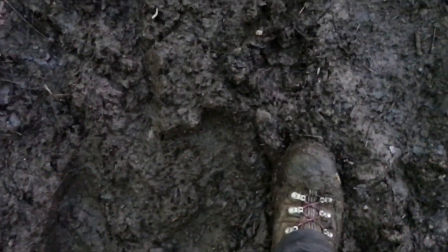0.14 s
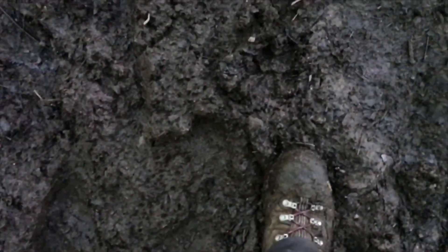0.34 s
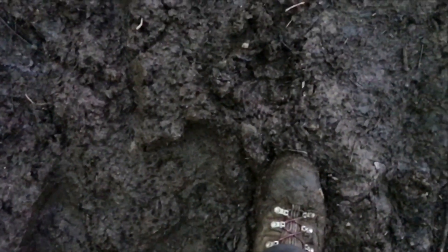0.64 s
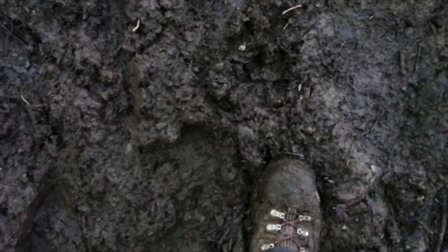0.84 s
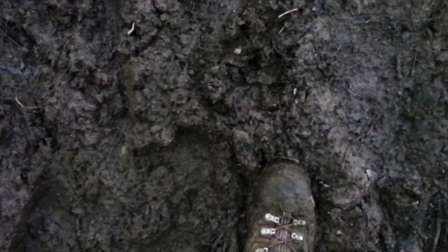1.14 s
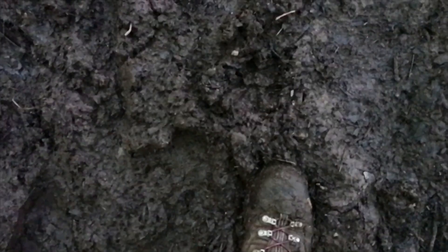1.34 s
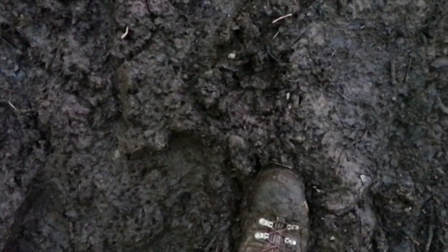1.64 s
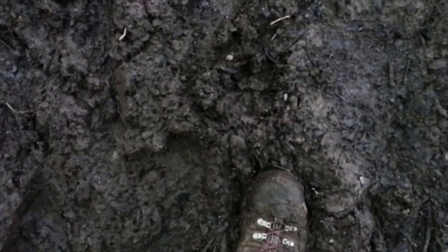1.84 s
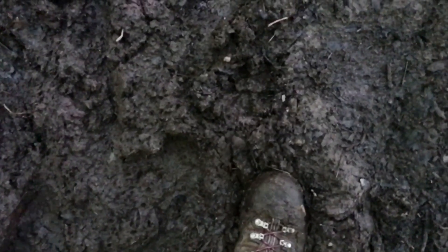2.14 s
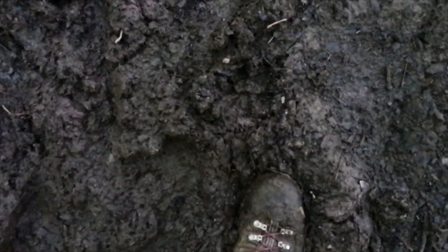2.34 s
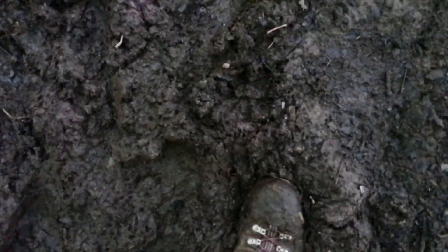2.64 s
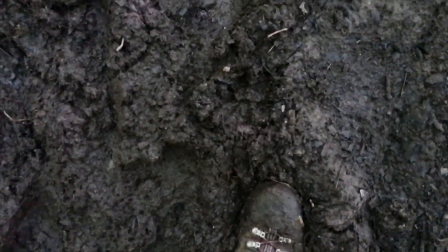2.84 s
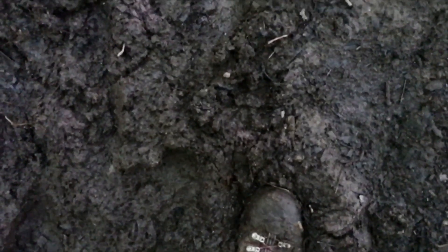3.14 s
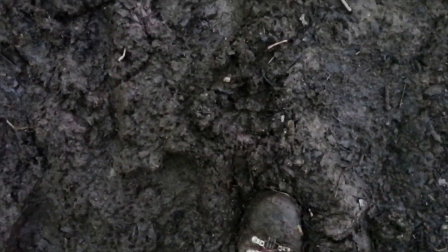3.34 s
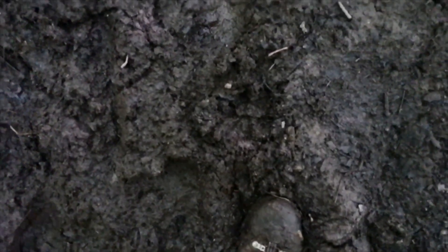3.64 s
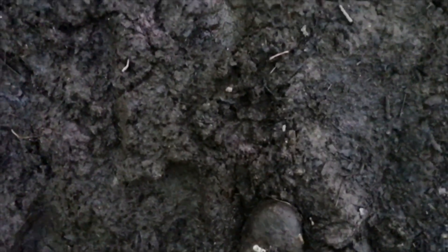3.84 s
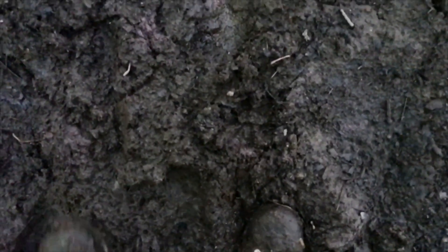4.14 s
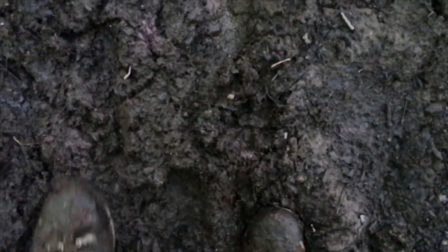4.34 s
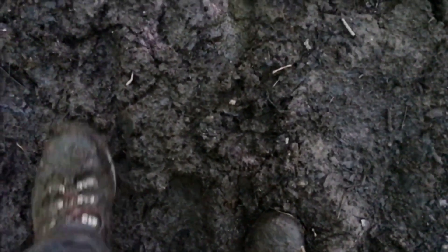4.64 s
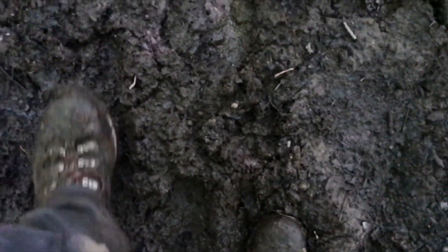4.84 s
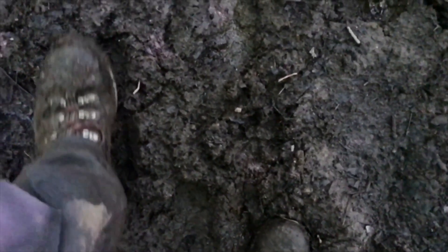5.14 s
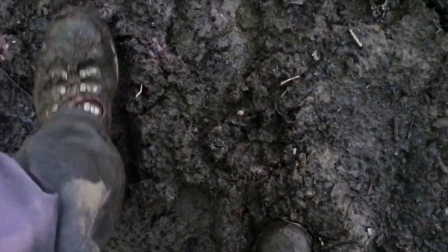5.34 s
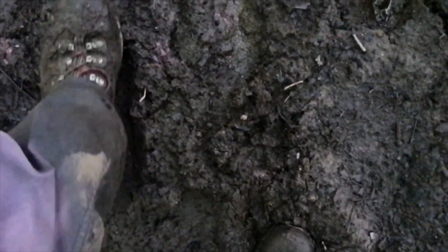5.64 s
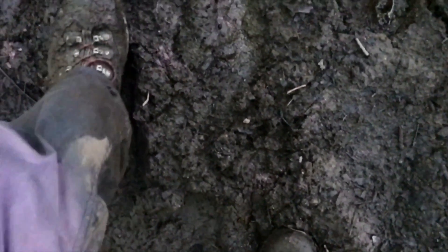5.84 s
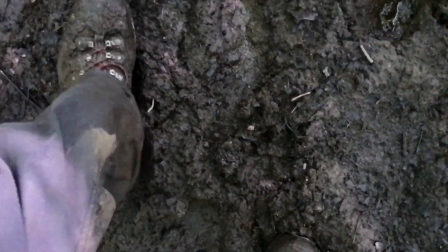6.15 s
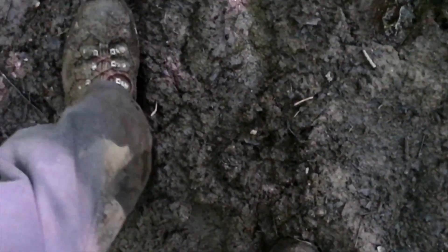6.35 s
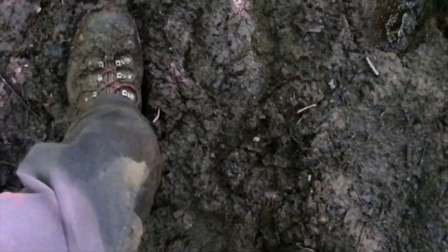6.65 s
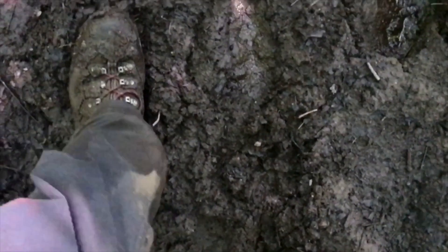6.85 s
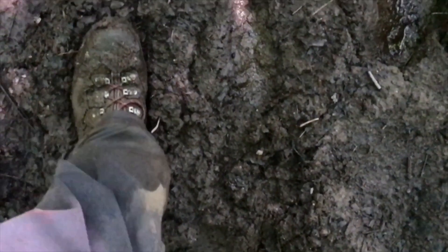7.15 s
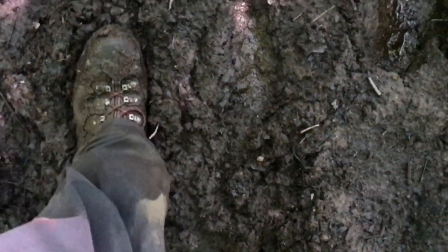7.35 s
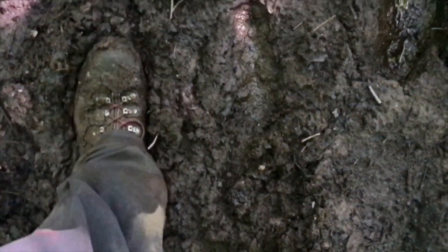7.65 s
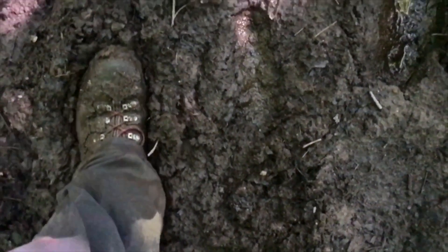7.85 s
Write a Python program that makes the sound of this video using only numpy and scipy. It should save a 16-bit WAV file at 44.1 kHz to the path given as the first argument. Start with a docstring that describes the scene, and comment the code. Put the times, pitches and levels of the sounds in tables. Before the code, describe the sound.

A boot works in deep wet mud, with muffled squelches, popping air pockets and short gurgles over a light wind rumble.

```python
"""A boot in deep wet mud

Water seeps and crackles through the mud as a boot works in it. Air pockets burst and ring as cavity
resonators, and air forced through wet channels gurgles round the sole. A light wind rumbles on the
microphone. The sound turns muffled within the first second; faint ticks and fuzz stand above the
muffled band at some of the pops."""
import sys
import numpy as np
from scipy import signal
from scipy.fft import irfft
from scipy.io import wavfile
from scipy.ndimage import uniform_filter1d

SR = 44100
rng = np.random.default_rng(int(sys.argv[2]) if len(sys.argv) > 2 else 0)


def digitize_waveform(pressure):
    """Quantize a signal to 16-bit integers and store it at the path in sys.argv[1].

    Rows of a 2-D input are taken as channels; values are limited to [-1, 1].
    """
    field = np.atleast_2d(pressure).T
    bounded = np.clip(field, -1, 1)
    quanta = np.round(bounded * 32767).astype(np.int16)
    wavfile.write(sys.argv[1], SR, quanta)


N = 352359

OVERTONE = 1.95  # upper resonance of a pocket or channel, as a multiple of its fundamental


def mud():
    """Superposition: countless small flows and bubbles sum to noise that swells as the mud is worked."""
    # Each row: time in seconds, seeping level in dB, suction and fizz in dB relative to the seeping.
    effort = [(0.0, -42.5, -21, 18), (0.07, -18, -23, -13.5), (0.2, -30, -2, 8), (0.29, -24.5, -21, -1),
              (0.35, -21, -6, -3), (0.5, -25, -8.5, -4.5), (0.95, -29, -5, 2), (1.98, -27.5, -7.5, -3.5),
              (2.25, -23.5, -6, -3), (3.31, -26.5, -5.5, 2.5), (3.78, -35, -4.5, -1.5),
              (4.09, -33, -3, -3.5), (5.0, -37.5, -0.2, -4), (5.76, -38.5, -1.5, -1),
              (5.88, -28, -10.5, -3), (6.48, -29, -1, -4), (6.99, -23, -5.5, -3.5), (7.25, -25.5, -4.5, -6),
              (7.5, -22, -2, -7.5), (7.99, -22, -7.5, -5.5)]
    # Spectra of seeping, deep suction and thin fizz. Each row: frequency in Hz, relative density in dB.
    seep_spectrum = [(220, -27.5), (320, 0.5), (450, 1), (800, -2), (1100, -4.5), (1600, -5.5), (2400, -24)]
    suction_spectrum = [(80, -20), (120, -5), (180, 1), (260, -2), (380, -11.5)]
    fizz_spectrum = [(900, -24.5), (1300, -6), (2000, 0.5), (3200, -0.5), (4500, -7.5), (7000, -14),
                     (11000, -20.5)]
    seep = 0.67 * patchy_noise(seep_spectrum, patchy_db=2.5, flicker_db=1.0)
    seep += 0.51 * bubbles(327.5, 1043, per_s=300, cycles=1.1, spread_db=3.0)
    suction = patchy_noise(suction_spectrum, patchy_db=2.8, flicker_db=2.5, size=1024)
    fizz = 0.85 * patchy_noise(fizz_spectrum, patchy_db=4.0, flicker_db=1.5)
    fizz += 0.39 * bubbles(1200, 3000, per_s=280, cycles=4.5, spread_db=5.0, rise=0.86)
    clicks = 0.29 * bubbles(600, 1900, per_s=64, cycles=0.99, spread_db=3.0, rise=0.32)
    level, suction_gain, fizz_gain = (gain_curve(effort, column) for column in (1, 2, 3))
    return level * (seep + clicks + suction_gain * suction + fizz_gain * fizz)


def bubbles(low_hz, high_hz, per_s, cycles, spread_db, rise=0.66, count=14):
    """Damped oscillation: tiny pockets close at random, each ringing a few cycles of rising pitch."""
    strength = gain_of(spread_db * np.minimum(rng.exponential(1, N), 4))
    impulses = strength * (rng.random(N) < per_s / SR)
    pitch_index, out = rng.integers(0, count, N), np.zeros(N)
    for k, hz in enumerate(np.geomspace(low_hz, high_hz, count)):
        age = np.arange(round(4 * SR * cycles / hz)) * hz / SR  # in cycles, as is the rise
        envelope = (1 - np.exp(-age / rise)) * np.exp(-age / cycles)
        ring = np.sin(2 * np.pi * (age + 0.025 * age ** 2)) * envelope
        out += signal.oaconvolve(impulses * (pitch_index == k), ring * np.sqrt(hz))[:N]
    return evened(out)


def pops():
    """Cavity resonance: an air pocket's skin tears with a crack and a snap, and the pocket rings."""
    # Each row: start in seconds, level in dB, pocket frequency in Hz, relative snap level in dB.
    pockets = [(0.06, -11, 504.5, -3), (0.076, -10.5, 603, 1), (0.122, -16, 510, 3), (0.159, -8, 435, -32),
               (0.247, -3.5, 990, -13), (0.364, -8.5, 3200, -8), (0.325, -11, 970, -10),
               (0.325, -4.5, 3360, -22.5), (0.608, -8.5, 480, 3), (0.636, -10, 443, -31.5),
               (0.693, -12, 1670, -7), (0.716, -14, 1465, 0), (1.2, -9, 405, -11), (1.264, -9.5, 1960, -13),
               (1.321, -7, 454, -7.5), (1.514, -6.5, 433, -24), (1.53, -13, 1074, -5),
               (1.55, 0.5, 426, -21), (1.663, -7.5, 484, -29), (1.767, -10, 847, -12),
               (1.916, -4, 423, -15.5), (1.93, -12.5, 450, -25), (1.954, -11.5, 550, -9),
               (1.958, 0.5, 517, -19.5), (1.98, -3.5, 522, -27.5), (2.022, -4.5, 560, -5),
               (2.101, -11.5, 556, -15), (2.255, -2, 437, -9.5), (2.274, -1, 1080, -10),
               (2.483, -1, 560, -15.5), (2.572, -10, 2040, -11.5), (2.618, -1.5, 1280, -17.5),
               (2.654, -12.5, 960, -10), (2.695, -9.5, 2007, -5), (2.721, -16.5, 1600, -14),
               (2.839, -7.5, 1400, -6), (2.929, -6.5, 468, -5), (2.993, -7.5, 475, -4.5),
               (3.101, -12, 2050, -4), (3.137, -13.5, 1080, -7), (3.149, -11, 2020, -13),
               (3.194, -9, 2040, -16.5), (3.205, -10.5, 700, -7), (3.2385, -10, 1910, -10.5),
               (3.351, -12, 1476, -18.5), (3.359, -11, 1540, -1.5), (3.468, -16.5, 1530, -1),
               (3.587, -12, 504, -5), (3.665, -22.5, 754, 2), (3.7056, -8, 954, -5),
               (3.958, -19.5, 384, -35), (4.018, -19, 847, 7), (4.246, -20.5, 445, -10.5),
               (4.812, -22, 2010, -13.5), (5.137, -15, 1660, 2.5), (5.158, -20, 1600, -7.5),
               (5.322, -14.5, 800, -4), (5.3437, -16, 910, -5.5), (5.811, -14.5, 1520, -7.5),
               (5.899, -16, 805, -9), (5.911, -7, 887, -9), (5.923, -10, 790, -9), (5.936, -14, 790, -2.5),
               (5.949, -16, 800, -2.5), (5.985, -12, 387, -8), (6.017, -12.5, 410, -18),
               (6.017, -13, 810, -23), (6.064, -13, 1275, -0.5), (6.235, -7.5, 868, -7.5),
               (6.703, -7, 850, -13.5), (6.7845, -11.5, 1100, -2.5), (6.808, -14.5, 1486, -5),
               (6.8814, -10.5, 966, 4.5), (6.986, -0.5, 900, -20.5), (6.997, -5, 620, -20),
               (7.005, -6, 834, -19), (7.016, -9, 790, -20), (7.105, -7, 904, -17), (7.116, -1, 790, -22),
               (7.129, 0.5, 905, -9.5), (7.153, -7, 933, -6.5), (7.228, -10.5, 785, -18),
               (7.353, -0.5, 337, -11), (7.407, -3.5, 360, -20), (7.522, -3, 497, -7),
               (7.607, -11.5, 470, -4), (7.673, 0.5, 756, -17), (7.709, -7.5, 385, -17),
               (7.811, -5, 332, -11.5), (7.83, -5.5, 253, -17), (7.8998, -1.5, 796, -14.5),
               (7.9285, -4, 887, -14)]
    crack_hz, push_hz, snap_t60_s = 1400, 214, .018
    out, t = np.zeros(N), np.arange(3000) / SR
    # The tear is one quick pressure swing; the mud giving way is one slow swing beneath it.
    crack = gain_of(0.5) * np.sin(2 * np.pi * crack_hz * t) * np.exp(-(crack_hz * t - 1) ** 2 / 0.27)
    push = gain_of(-19.5) * np.sin(2 * np.pi * push_hz * t) * np.exp(-push_hz * t / 0.82)
    for start, db, hz, snap_db in pockets:
        noise = rng.standard_normal(len(t))
        t60_s = 0.021 + 5.7 / hz  # large pockets ring longer
        roughness = 1 + .3 * smoothed(noise, 60)
        wander = .06 * smoothed(noise[::-1], 120)
        phase = 2 * np.pi * np.cumsum(hz * (1 + 2.7 * t + wander)) / SR
        ring = np.sin(phase) + gain_of(-15.5) * np.sin(OVERTONE * phase)
        ring *= roughness * rise_and_decay(t, rise_s=.001, t60_s=t60_s)
        snap = spray(noise) * rise_and_decay(t, rise_s=.0003, t60_s=snap_t60_s)
        add(out, start, gain_of(db) * (ring + push + gain_of(snap_db) * (snap + crack)))
    return out


def gurgles():
    """Forced resonance: puffs of air spit spray and drive a channel whose pitch slides as the boot shifts."""
    # Each row: start in seconds, level in dB, channel frequency in Hz, length in seconds,
    # relative spray level in dB, pitch slide in octaves.
    channels = [(0.04, -24.5, 513, 0.08, -5.5, 0.051), (0.113, -23.5, 453, 0.071, -12, -0.013),
                (0.256, -29, 990, 0.031, 7.5, 0.1), (0.311, -25, 1076, 0.094, 1, -0.67),
                (0.847, -25, 1510, 0.029, -1.5, -0.39), (1.186, -27, 404, 0.047, 0, -0.38),
                (1.345, -26, 190, 0.08, -21, -0.045), (1.605, -30.5, 410, 0.099, -19.5, 0.4),
                (1.89, -22.5, 395, 0.069, -8.5, 0.54), (2.036, -24, 523, 0.043, -15, 0.43),
                (2.17, -33.5, 893, 0.037, 14, 0.11), (2.229, -31, 379, 0.034, 14.5, 0.31),
                (2.26, -17.5, 925, 0.0256, -1, .6), (2.345, -33, 810, 0.022, 16, -0.097),
                (2.469, -22, 598, 0.066, -2, -0.45), (2.601, -24.5, 1400, 0.023, 2, .05),
                (2.917, -30.5, 460, 0.12, 4.5, 0.61), (3.446, -26, 436, 0.056, -8, -0.047),
                (3.946, -28, 456, 0.042, -22.5, -0.33), (4.014, -28, 837, 0.12, -31, 0.32),
                (4.045, -30, 439, 0.12, -25, 0.14), (4.165, -32, 793, 0.04, 2.5, 0.15),
                (4.867, -31.5, 490, 0.043, -11.5, 0.2), (5.893, -26.5, 824, 0.081, -4.5, 0.012),
                (5.966, -23.5, 805, 0.024, -12, -0.36), (6.229, -26, 894, 0.036, -8, 0.12),
                (6.814, -25.5, 238, 0.11, 2.5, -0.16), (6.987, -23.5, 870, 0.086, -22, -0.32),
                (7.102, -23.5, 843, 0.055, 1.5, -0.087), (7.274, -22.5, 188, 0.053, 1, 0.78),
                (7.319, -17.5, 385, 0.081, -10.5, 0.41), (7.396, -24.5, 706, 0.055, -18, -0.53),
                (7.374, -21, 363, 0.082, -11.5, 0.062), (7.517, -22.5, 707, 0.056, -3.5, 0.79),
                (7.729, -20.5, 183.6, 0.082, -12.5, 0.23), (7.798, -20, 191, 0.099, -7.5, -0.029),
                (7.899, -31, 800, 0.043, -14, 0.13)]
    out = np.zeros(N)
    for start, db, hz, length_s, spray_db, slide in channels:
        air, hiss, throb = rng.standard_normal((3, 8000))
        size = round(length_s * SR)
        puffs = gain_of(2.5 * smoothed(throb, 180))
        progress = (np.arange(len(air)) / size).clip(0, 1)
        pitch = hz * 2 ** (slide * (progress - .5))
        fundamental = resonate(resonate(air * puffs, pitch, 0.35 * hz), pitch, 0.4 * hz)
        overtone = resonate(air * puffs, OVERTONE * pitch, 0.24 * hz)
        ring = evened(fundamental[:size]) + gain_of(-13.5) * evened(overtone[:size])
        spit = gain_of(spray_db) * evened((spray(hiss) * puffs)[:size])
        add(out, start, gain_of(db) * (ring + spit) * signal.windows.tukey(size, .4))
    return out


def spray(noise):
    """Broadband excitation: tearing wet mud hisses in two wide, overlapping bands."""
    return evened(resonate(noise, 1000, width_hz=490) + 0.53 * resonate(noise, 1700, width_hz=1000))


def wind():
    """Pressure fluctuation at the microphone: gusts rise fast and die as a slowing flutter, over a drone."""
    # Spectra of the breeze and the low drone. Each row: frequency in Hz, relative density in dB.
    rumble_spectrum = [(6, -10), (14, 1.5), (30, -8), (50, -14.5), (80, -30)]
    drone_spectrum = [(30, -9), (50, 3), (80, -5.5), (110, 0.5), (160, -23)]
    # Each row: time of the peak in seconds, level in dB, flutter frequency at the peak in Hz.
    gusts = [(.43, -30, 59), (2.26, -26.5, 43), (4.975, -18.5, 15), (6.438, -19, 19)]
    rise_db_per_s, fall_db_per_s, sag_octaves_per_s = 502, 65.5, 2.7
    rumble = patchy_noise(rumble_spectrum, patchy_db=0.0, flicker_db=5.0, size=8192)
    drone = patchy_noise(drone_spectrum, patchy_db=2.5, flicker_db=0.8, size=2048)
    out = gain_of(-42) * rumble + gain_of(-42.5) * drone
    for peak_s, db, hz in gusts:
        t = np.arange(N) / SR - peak_s
        envelope = gain_of(db - np.maximum(-rise_db_per_s * t, fall_db_per_s * t))
        phase = 2 * np.pi * np.cumsum(hz * 2 ** (-sag_octaves_per_s * t.clip(0))) / SR
        flutter = np.sqrt(2) * np.cos(phase - phase[round(peak_s * SR)])
        out += envelope * (.75 * flutter + .25 * rumble)
    return out


def ticks():
    """Band-limited impulses: each faint tick is a sharp pulse with a weaker, inverted one just behind."""
    # Each row: time in seconds, level in dB, lower and upper band edges in Hz.
    pulses = [(0.3471, -45, 6430, 16000), (0.3584, -46, 6240, 16000), (0.6105, -43.5, 4400, 15900),
              (1.3224, -43.5, 4500, 8500), (1.553, -38.5, 2500, 10600), (1.9555, -34.5, 2490, 12500),
              (1.9614, -33.5, 2500, 12600), (2.0222, -38.5, 4670, 11200), (2.2548, -41, 3200, 16100),
              (2.2616, -40, 3060, 16200), (2.2705, -39, 3220, 14100), (2.277, -37.5, 4500, 14000),
              (2.4855, -47, 4300, 8000), (2.6203, -33.5, 2490, 15000), (3.706, -39, 2500, 13500),
              (5.986, -37, 2500, 11400), (6.0646, -41.5, 2480, 14300), (6.785, -45, 2500, 15100),
              (6.8823, -23.5, 2450, 14600), (6.988, -23.5, 2490, 14300), (7.12, -40, 4370, 12600),
              (7.1327, -45, 4530, 12450), (7.3577, -50, 5400, 11300), (7.677, -46, 4650, 12000),
              (7.901, -24.5, 2490, 16100)]
    # Spectrum of a pulse. Each row: frequency in Hz, relative density in dB.
    tick_spectrum = [(2300, 10), (4000, 2), (5000, -4), (7000, -8.5), (10000, -14.5), (16000, -21.5)]
    min_gap_s, skirt_db_per_hz = .0006, 0.051
    hz, out = np.fft.rfftfreq(1024, 1 / SR), np.zeros(N)
    for time_s, db, low_hz, high_hz in pulses:
        gap, share = rng.random(2)
        outside_hz = np.maximum(low_hz - hz, 0) + np.maximum(hz - high_hz, 0)
        spectrum = gain_of(spectrum_db(tick_spectrum, hz) - skirt_db_per_hz * outside_hz)
        pulse = np.roll(irfft(spectrum), 512) * np.hanning(1024)
        pulse *= gain_of(db) / pulse.max()
        start = time_s - 512 / SR
        add(out, start, pulse)
        add(out, start + min_gap_s * (1 + gap), -.5 * share * pulse)
    return out


def fuzz():
    """Gated noise: short, very quiet crackly patches lie just above the muffled band."""
    # Each row: start in seconds, level in dB.
    patches = [(1.31, -62), (1.94, -60.5), (2.012, -60), (2.61, -56), (2.72, -55), (3.464, -53),
               (4.812, -64), (5.315, -64), (5.34, -63), (6.045, -55.5), (6.775, -56), (6.87, -54),
               (6.975, -54), (7.889, -53)]
    # Spectrum of the fuzz. Each row: frequency in Hz, relative density in dB.
    fuzz_spectrum = [(2250, -26), (2450, 8.5), (3000, -25.5), (4500, -26), (7000, -38.5), (13000, -52.5)]
    gate, length_s = np.zeros(N), .024
    for start, db in patches:
        add(gate, start, gain_of(db) * signal.windows.tukey(round(length_s * SR), .3))
    return gate * patchy_noise(fuzz_spectrum, patchy_db=-2.0, flicker_db=2.5, size=128)


def muffled(x):
    """Low-pass filtering: the cutoff sinks, fast at first, and takes the treble with it."""
    open_hz, shut_hz, sink_s = 9400, 2155.5, 1.167
    hz, t, spectra = signal.stft(x, SR, nperseg=2048, noverlap=1792)
    cutoff_hz = shut_hz + (open_hz - shut_hz) * (1 - t / sink_s).clip(0, 1) ** 3.83
    above_hz = np.maximum(hz[:, None] - cutoff_hz, 0)
    loss_db = np.minimum(0.0022 * above_hz ** 2, 120)
    return signal.istft(spectra * gain_of(-loss_db), SR, nperseg=2048, noverlap=1792)[1][:, :N]


def patchy_noise(spectrum, patchy_db, flicker_db, size=512):
    """Random modulation: coloured noise varies in drifting spectral patches and flickers as a whole."""
    hop = size // 4
    frames, hz = N // hop + 5, np.fft.rfftfreq(size, 1 / SR)
    real, imag, patches = rng.standard_normal((frames, len(hz), 3)).T
    patches = smoothed(uniform_filter1d(patches, size=5, axis=0), 8)
    flicker = smoothed(rng.standard_normal(frames), 4)
    level_db = spectrum_db(spectrum, hz)[:, None] + patchy_db * patches + flicker_db * flicker
    spectra = (real + 1j * imag) * gain_of(level_db)
    return evened(signal.istft(spectra, nperseg=size, noverlap=size - hop)[1][:N])


def resonate(x, hz, width_hz):
    """Heterodyne resonator: shifts a fixed or gliding frequency to zero, smooths, and shifts back."""
    carrier = np.exp(2j * np.pi * np.cumsum(hz * np.ones(len(x))) / SR)
    pole = np.exp(-np.pi * width_hz / SR)
    return 2 * (carrier * signal.lfilter([1 - pole], [1, -pole], x / carrier)).real


def rise_and_decay(t, rise_s, t60_s):
    """Exponential onset and damping; the damping takes away 60 dB in t60_s."""
    return (1 - np.exp(-t / rise_s)) * gain_of(-60 * t / t60_s)


def gain_of(db):
    """Amplitude ratio of a level in decibels."""
    return 10 ** (np.asarray(db) / 20)


def evened(x):
    """Normalisation to an rms of 1."""
    return x / np.sqrt(np.mean(x ** 2) + 1e-20)


def smoothed(noise, size):
    """A moving average turns noise into a slow fluctuation with an rms of 1."""
    return evened(uniform_filter1d(noise, size=size))


def spectrum_db(points, hz):
    """Interpolation of a spectrum in log frequency, with -90 dB beyond its ends."""
    point_hz, db = np.transpose(points)
    return np.interp(np.log(hz + 1), np.log(point_hz + 1), db, -90, -90)


def gain_curve(rows, column):
    """Interpolation of a column of decibels in time, as a gain at every sample."""
    rows = np.array(rows)
    return gain_of(np.interp(np.arange(N) / SR, rows[:, 0], rows[:, column]))


def add(mix, start_s, sound):
    """Superposition of a sound on the mix from start_s onward."""
    part = mix[max(round(start_s * SR), 0):][:len(sound)]
    part += sound[:len(part)]


def scene():
    """Superposition: the pressures of mud and wind add at one microphone."""
    return (mud() + pops() + gurgles() + wind())[None]


def record(dry):
    """Soft saturation rounds the peaks; muffling follows, then ticks, fuzz, faint hiss and a band limit."""
    ceiling, hiss_db, band_limit_hz = .57, -102, 15800
    squeezed = dry / (1 + (abs(dry) / ceiling) ** 4) ** .25
    heard = muffled(squeezed) + ticks() + fuzz() + gain_of(hiss_db) * rng.standard_normal(N)
    low_pass = signal.firwin(511, band_limit_hz, window=("kaiser", 9), fs=SR)
    return signal.oaconvolve(heard, low_pass[None], "same")


dry = scene()
out = record(dry)
digitize_waveform(out)
```